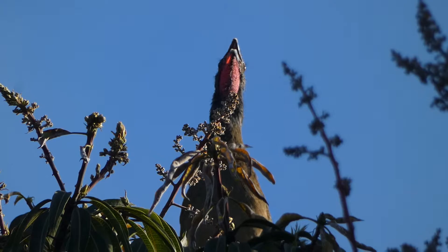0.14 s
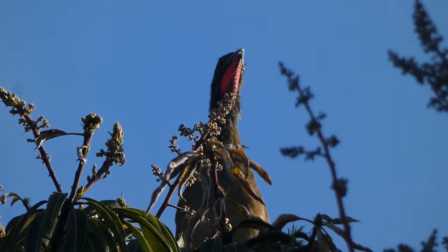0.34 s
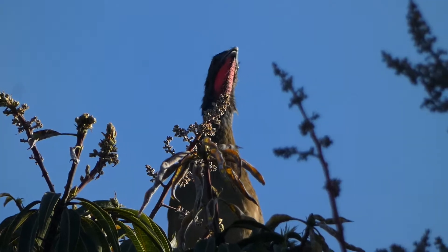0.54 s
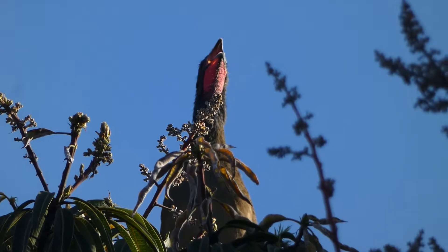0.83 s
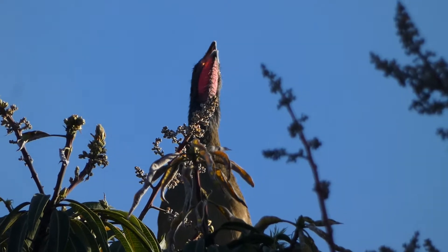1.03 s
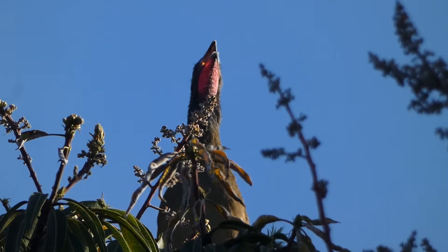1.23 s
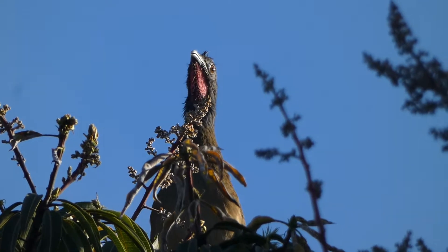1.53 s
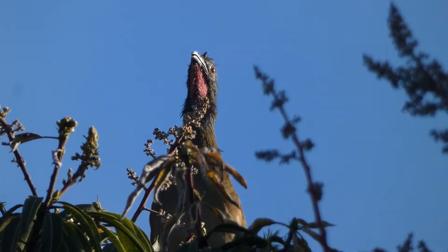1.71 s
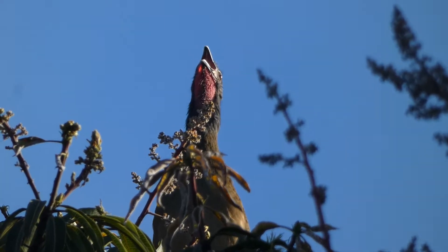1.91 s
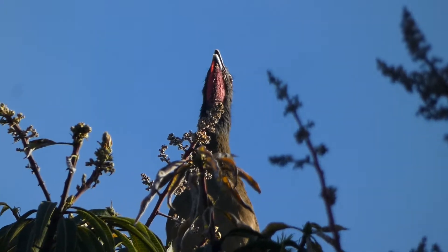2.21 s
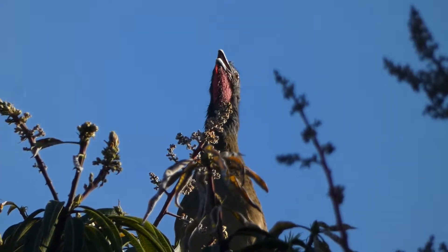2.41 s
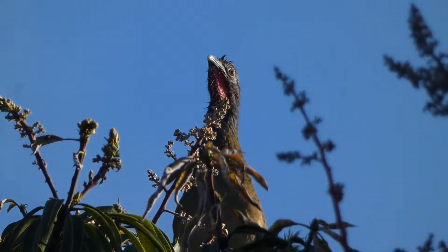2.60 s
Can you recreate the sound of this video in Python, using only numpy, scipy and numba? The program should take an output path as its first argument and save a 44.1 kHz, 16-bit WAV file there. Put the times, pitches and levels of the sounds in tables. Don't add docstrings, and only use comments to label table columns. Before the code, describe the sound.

Two large treetop birds duet in loud, harsh, raspy cackles, one deep and one shrill

```python
import sys
import numpy as np
from scipy import signal
from scipy.io import wavfile
from scipy.ndimage import uniform_filter1d
from numba import njit

SR = 44100
rng = np.random.default_rng(int(sys.argv[2]) if len(sys.argv) > 2 else 0)


def gain_from_decibels(decibels):
    exponent = np.asarray(decibels, float) / 20
    return 10 ** exponent


def waveform_to_disk(signal):
    frames = np.transpose(np.atleast_2d(signal))
    scaled = np.clip(frames, -1, 1) * 32767
    samples = np.round(scaled).astype(np.int16)
    wavfile.write(sys.argv[1], SR, samples)


N = 121275


def level(x, db):
    return x * gain_from_decibels(db) / np.sqrt(np.mean(x ** 2))


def pan(x, db):
    return x * gain_from_decibels(np.array([[db / 2], [-db / 2]]))


def walk(rate):
    hold = int(SR / rate)
    held = np.repeat(rng.standard_normal(N // 64), hold)[:N]
    return 1.14 * uniform_filter1d(uniform_filter1d(held, hold), hold)


@njit
def resonance(x, hz, width):
    y, band, low = np.empty(len(x)), 0., 0.
    for i in range(len(x)):
        g, k = np.tan(np.pi * hz[i] / SR), width / hz[i]
        v = (band + g * (x[i] - low)) / (1 + g * (g + k))
        band, low, y[i] = 2 * v - band, low + 2 * g * v, k * v
    return y


def syllables(calls, drop, release):
    t = np.arange(N) / SR
    envelope, tune = np.zeros(N), np.ones(N)
    sag_db = -9
    for start, length, db, attack, ratio in calls:
        age = t - start
        rise = np.clip(age / attack, 0, 1)
        fall = np.exp(-np.maximum(age - length + release, 0) ** 2 / release ** 2)
        sag = gain_from_decibels(db + sag_db * np.clip((age - attack) / length, 0, 1))
        envelope += sag * rise ** 0.83 * fall
        tune = np.where(age > 0, ratio * (1 + drop * (1 - rise)), tune)
    return envelope, tune


def syrinx(rate, scatter, size_db, breath):
    chance = rng.standard_normal((N // 30, 2))
    at = np.cumsum(SR / rate * np.exp(scatter * chance[:, 0]))
    keep = at < N - 2
    at, size = at[keep], gain_from_decibels(size_db * chance[keep, 1])
    sample, part = at.astype(int), at % 1
    pulses = np.bincount(sample, size * (1 - part), N) + np.bincount(sample + 1, size * part, N)
    gate = signal.lfilter([1], [1, -np.exp(-3 * rate / SR)], pulses)
    puffs = gate * rng.standard_normal(N)
    return level(pulses, 0) * np.sqrt(1 - breath) + level(puffs, 0) * np.sqrt(breath)


def bird(calls, pipe, voice):
    rate, scatter, size_db, breath, drop, release = voice
    envelope, tune = syllables(calls, drop, release)
    flutter = gain_from_decibels(0.91 * walk(60.39))
    driven = syrinx(rate, scatter, size_db, breath) * envelope * flutter
    out, power = 0, 0
    for k, (hz, width, db, side_db) in enumerate(pipe):
        centre = hz * tune * (1 + 0.017 * walk(40))
        ring = resonance(resonance(driven, centre, 1.48 * width), centre, 1.48 * width)
        out = out + pan((-1) ** k * gain_from_decibels(db) * ring, side_db)
        power += gain_from_decibels(2 * db) * width * 2 / SR
    return out / np.sqrt(power)


# t/s, length/s, level/dB, attack/s, tuning ratio
MALE_CALLS = [
    (.25, 0.14, -24, 0.11, 0.98),
    (.434, 0.072, -23.5, 0.019, .99),
    (.530, 0.048, -18.5, 0.01, 1.02),
    (.581, 0.048, -18.5, 0.018, 1.027),
    (.755, .15, -23, 0.032, .99),
    (1.385, 0.13, -23.5, 0.1, 0.98),
    (1.572, 0.075, -25, .012, 0.976),
    (1.665, 0.048, -17.5, 0.0096, 1.035),
    (1.718, 0.054, -19, 0.014, 1.017),
    (1.89, 0.15, -22.5, 0.029, .99),
]
# f/Hz, width/Hz, level/dB, left-right/dB
MALE_WINDPIPE = [(575.4, 49.6, -6.5, 2), (1043, 153, -0.5, -4), (1638, 180, -8.5, -3),
                 (1908, 102, -10, 1.5), (2256, 288, -8.5, -4), (3693, 420, -10.5, -2), (4730, 740, -26, -2),
                 (5240, 550, -19, -2), (6430, 650, -22.5, -2), (8400, 800, -28, -2.5), (9920, 530, -34, -7),
                 (12500, 2700, -54.5, -8)]
# pulses/Hz, period scatter, size scatter/dB, breath share, tuning drop at onset, release/s
MALE_SYRINX = (529.5, -0.08, -2, 0.89, 0.13, 0.0572)


def male():
    return bird(MALE_CALLS, MALE_WINDPIPE, MALE_SYRINX)


# t/s, length/s, level/dB, attack/s, tuning ratio
FEMALE_CALLS = [(.088, 0.12, -22.5, 0.021, .99), (.715, 0.12, -22, 0.031, 0.99),
                (.866, 0.047, -21.5, 0.0071, .99), (.935, 0.037, -23.5, 0.0056, 1.013),
                (.975, 0.042, -20.5, 0.0038, 1.008), (1.014, 0.062, -22.5, 0.0094, 0.995),
                (1.19, 0.13, -22.5, .025, 0.99), (1.865, 0.11, -22, .03, 0.99),
                (2.016, 0.045, -20.5, 0.0065, 1.002), (2.082, 0.037, -21.5, 0.0048, 1),
                (2.125, .095, -21, 0.0058, 1.024), (2.345, 0.12, -22.5, 0.017, 1)]
# f/Hz, width/Hz, level/dB, left-right/dB
FEMALE_WINDPIPE = [(736, 53, -21.5, -8.5), (1157, 224, -7, -2.5), (1459, 120, -2, -7),
                   (1851, 135, -0.5, -1), (2257, 340, -17.5, -11.5), (3332, 430, -5.5, -1.5),
                   (3790, 318, -5, -2.5), (5345, 760, -4.5, -2), (7090, 560, -11, -2.5),
                   (9010, 1030, -17.5, -1.5), (10520, 570, -26, -5), (12270, 1000, -34.5, -8),
                   (14500, 1500, -49, 9)]
# pulses/Hz, period scatter, size scatter/dB, breath share, tuning drop at onset, release/s
FEMALE_SYRINX = (800, .16, 2.25, 0.33, 0.034, 0.016)


def female():
    return bird(FEMALE_CALLS, FEMALE_WINDPIPE, FEMALE_SYRINX)


def close_leaves(pair):
    decay_s, scatter_db = 0.01, -6
    age = np.arange(2048) / SR
    burst = rng.standard_normal((2, len(age))) * np.exp(-age / decay_s)
    burst *= gain_from_decibels(scatter_db) / np.sqrt(decay_s * SR / 2)
    return signal.fftconvolve(pair, burst, axes=1)[:, :N]


# t/s, length/s, level/dB, attack/s, tuning ratio
FAR_CALLS = [
    (.15, 0.14, -36, 0.04, .99),
    (.64, 0.21, -36.5, 0.021, 1.05),
    (.90, 0.061, -31.5, .02, .98),
    (1.2, 0.16, -35, 0.023, 1.02),
    (2.02, 0.082, -32, 0.014, .97),
    (2.42, 0.091, -36.5, 0.033, .99),
    (2.6, 0.087, -64, 0.0081, .99),
]
# f/Hz, width/Hz, level/dB, left-right/dB
FAR_WINDPIPE = [(1246, 51, 3, -8), (1910, 100, -36, -2), (3260, 400, -11, -0.5)]
# pulses/Hz, period scatter, size scatter/dB, breath share, tuning drop at onset, release/s
FAR_SYRINX = (625, 0.07, 3.6, 0.25, .01, 0.031)


def far_bird():
    return bird(FAR_CALLS, FAR_WINDPIPE, FAR_SYRINX)


@njit
def trunks(x, lags, gain, damp):
    line, soft, out = np.zeros((8, 8192)), np.zeros(8), np.zeros((2, len(x)))
    for i in range(len(x)):
        total = 0.
        for k in range(8):
            soft[k] += (1 - damp) * (gain[k] * line[k, (i - lags[k]) & 8191] - soft[k])
            total += soft[k]
            out[k % 2, i] += soft[k]
        for k in range(8):
            line[k, i & 8191] = x[i] + soft[k] - total / 4
    return out


def tree_echo(pair, far):
    send = gain_from_decibels(-16.5) * pair.mean(axis=0) + gain_from_decibels(-7.5) * far.mean(axis=0)
    lags = rng.integers(900, 5000, size=8)
    t60_s = 1
    return trunks(send, lags, gain_from_decibels(-60 * lags / SR / t60_s), 0.32)


# t/s, level/dB
ENGINE_LEVEL = [
    (0.0, -72),
    (0.11, -64),
    (0.71, -44.5),
    (1.35, -55.5),
    (1.93, -54),
    (2.15, -67),
    (2.72, -50.5),
    (2.75, -59),
]


def engine_hum():
    hz, width_hz = 93., 4.4
    t = np.arange(N) / SR
    pitch = hz * (1 + 0.016 * walk(4.9))
    tone = np.sin(2 * np.pi * np.cumsum(pitch) / SR)
    rough = level(resonance(rng.standard_normal(N), np.full(N, hz), width_hz), -7.5)
    times, db = np.array(ENGINE_LEVEL).T
    return pan((tone + rough) * gain_from_decibels(np.interp(t, times, db)), .8)


# f/Hz, level/dB per Hz
AIR_SPECTRUM = [(15, -87), (25, -75), (86, -7.5), (250, -9.5), (811, -13.5), (1030, -9), (1240, -18.5),
                (1630, -9), (15000, -70)]


def outdoor_floor():
    out = 0
    table_hz, table_db = np.array(AIR_SPECTRUM).T
    for hz in 30 * 2 ** np.arange(0, 9, .5):
        centre = np.full(N, hz)
        mid = resonance(rng.standard_normal(N), centre, hz / 3)
        side = resonance(rng.standard_normal(N), centre, hz / 3)
        db = np.interp(np.log(hz), np.log(table_hz), table_db) + 3.0 * walk(6.18)
        out = out + gain_from_decibels(db) * (mid + 0.61 * side * np.array([[1], [-1]]))
    return level(out, -43)


def scene():
    pair = male() + female()
    far = far_bird()
    return pair + close_leaves(pair) + far + tree_echo(pair, far) + engine_hum() + outdoor_floor()


def roll_off(x):
    return signal.sosfilt(signal.butter(12, 15770, fs=SR, output="sos"), x)


def record(dry):
    top_cut = signal.ellip(8, .2, 70, 15800, fs=SR, output="sos")
    mix = signal.sosfilt(top_cut, dry)
    return roll_off(mix)


dry = scene()
out = record(dry)
waveform_to_disk(out)
```